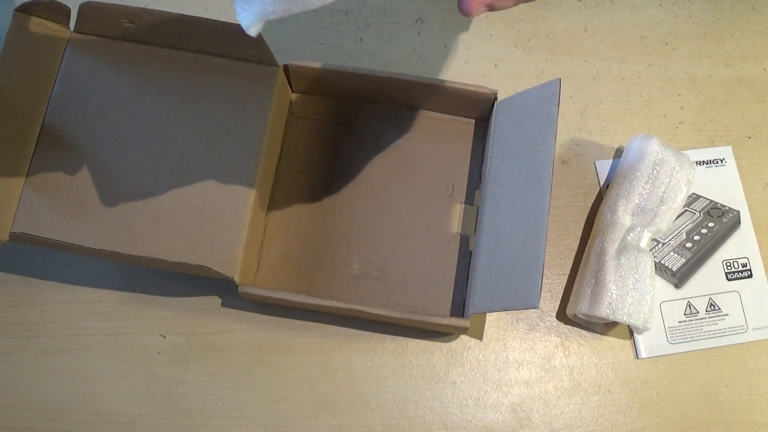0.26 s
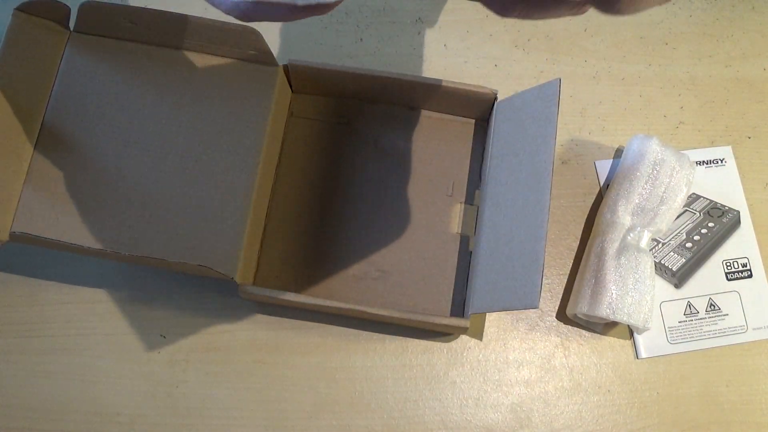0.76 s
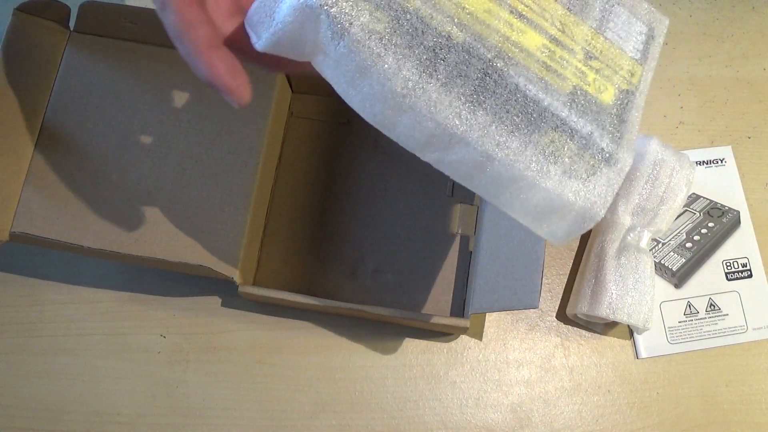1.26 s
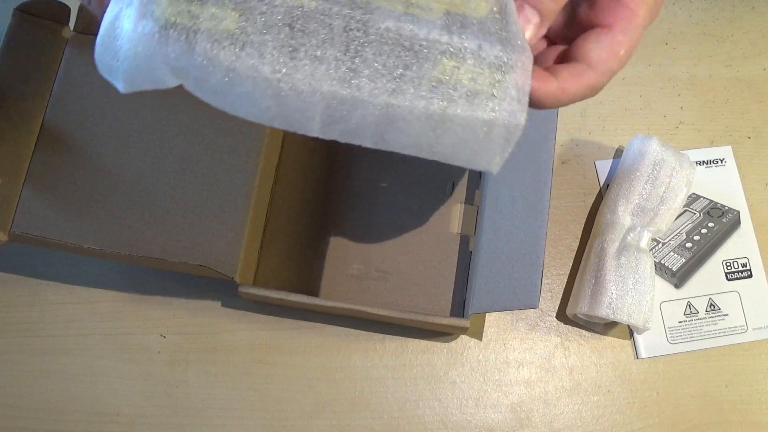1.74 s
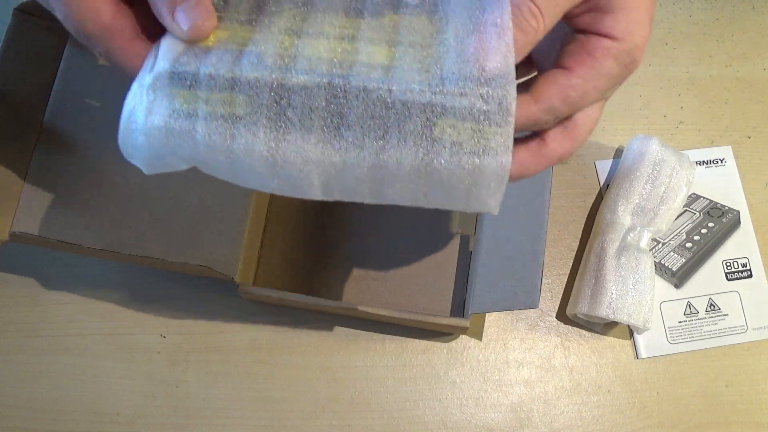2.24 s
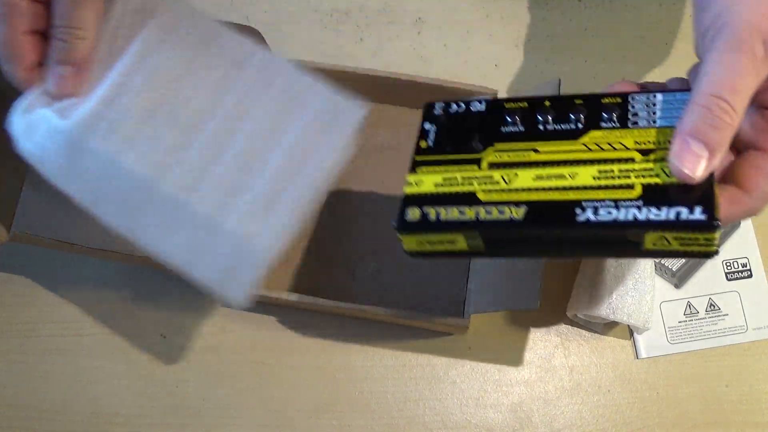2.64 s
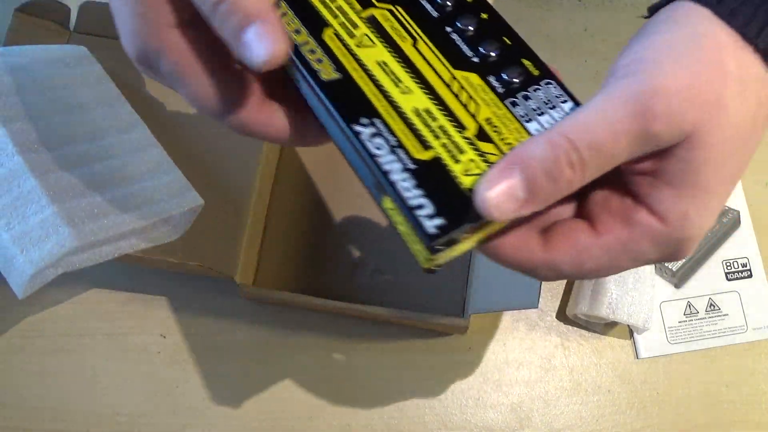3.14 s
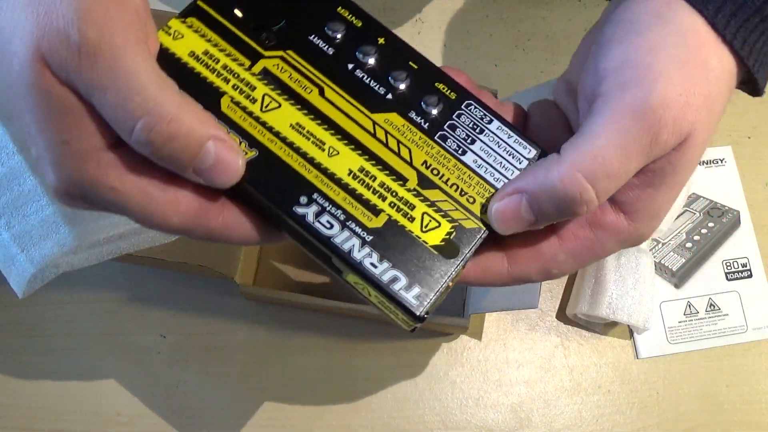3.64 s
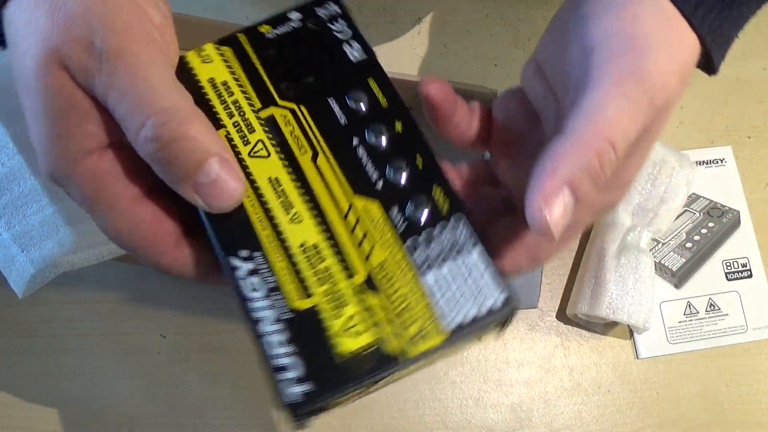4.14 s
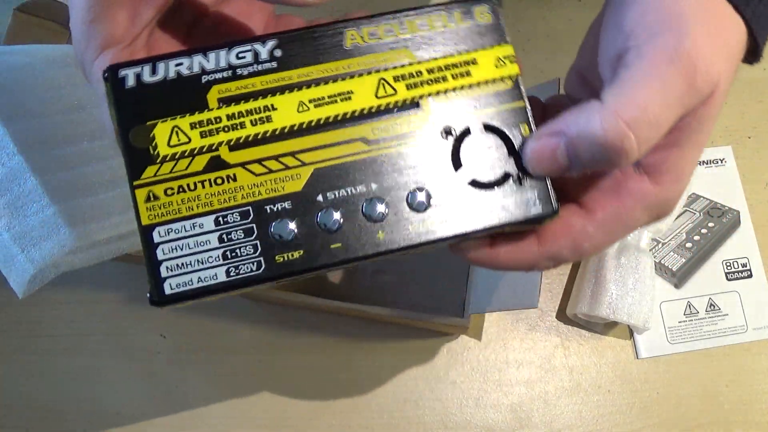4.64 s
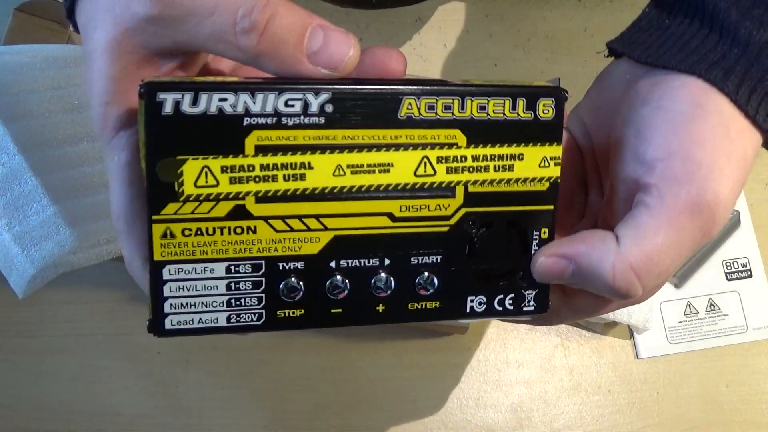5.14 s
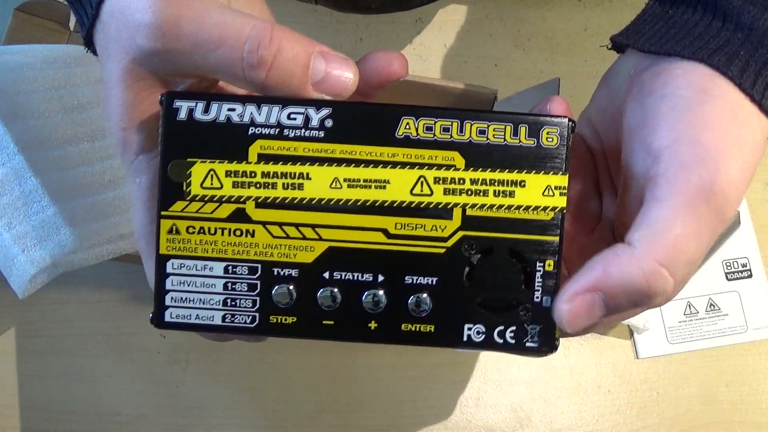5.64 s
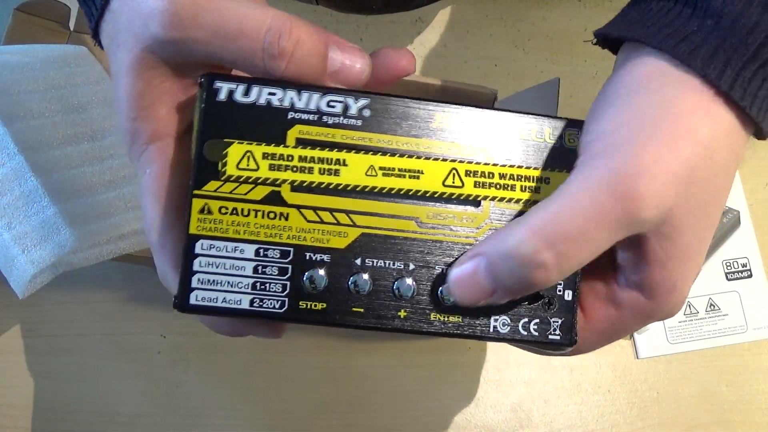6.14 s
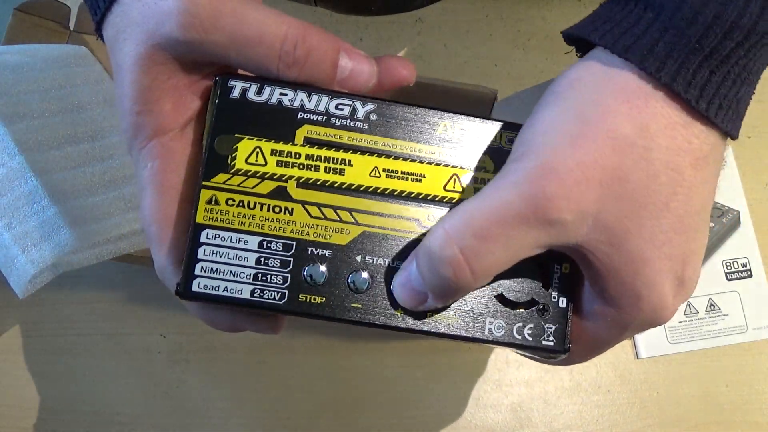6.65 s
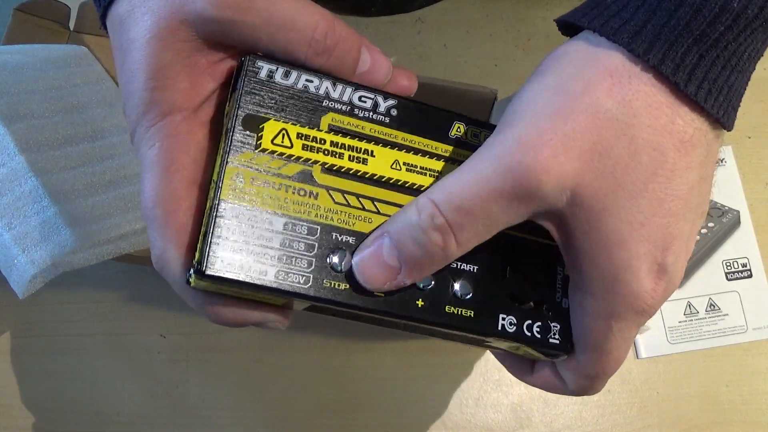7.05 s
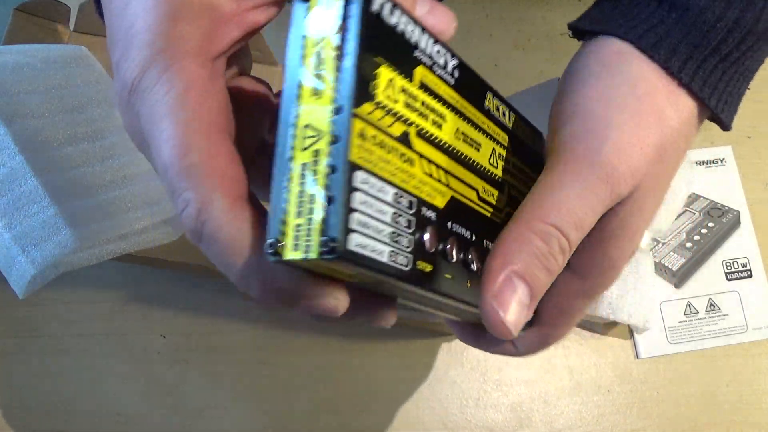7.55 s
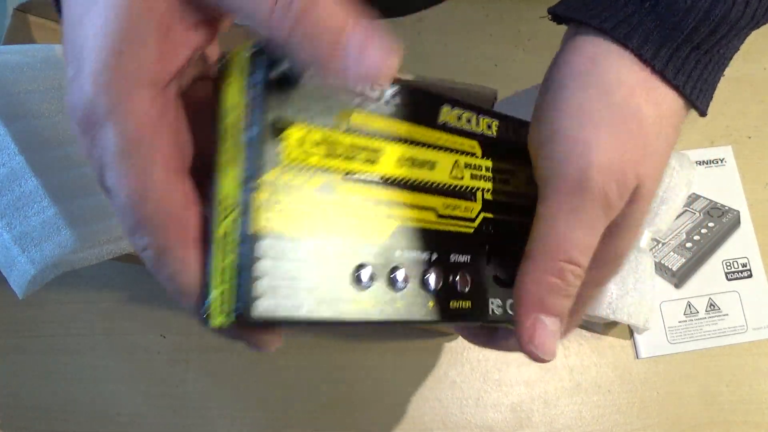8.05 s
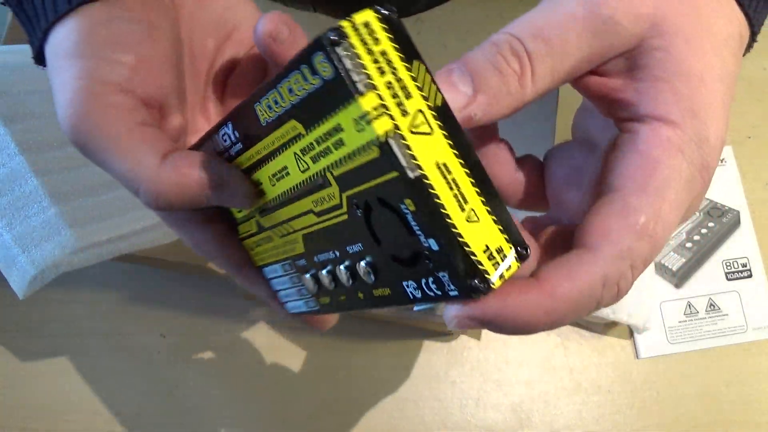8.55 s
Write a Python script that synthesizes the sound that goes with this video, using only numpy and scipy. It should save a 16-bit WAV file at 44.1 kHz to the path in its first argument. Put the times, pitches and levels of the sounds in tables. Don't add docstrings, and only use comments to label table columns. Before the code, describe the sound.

Close up over a table in a small room, thin packing foam is tugged off a hollow metal case in bright, crackling, squeaky bursts with sharp snaps. The rustle stops abruptly around three seconds; faint skin slides and soft scrapes follow. After a quiet pause, a thumb presses buttons with crisp irregular clicks and brief hollow knocks, ending in light ticks over low hiss and hum.

```python
import sys
import numpy as np
from scipy import signal
from scipy.fft import rfft, irfft
from scipy.io import wavfile
from scipy.ndimage import uniform_filter1d

SR = 44100
rng = np.random.default_rng(int(sys.argv[2]) if len(sys.argv) > 2 else 0)


def makeup_ratio(level_db):
    decades = np.asarray(level_db, float) / 20
    return 10 ** decades


def materialize(psi):
    bounded = np.clip(np.atleast_2d(psi).T, -1, 1)
    quanta = np.round(bounded * 32767).astype(np.int16)
    wavfile.write(sys.argv[1], SR, quanta)


N = 387638
TIME = np.arange(N) / SR


def evened(x):
    return x / np.sqrt(np.mean(x ** 2) + 1e-20)


def read(points, hz):
    f, value = np.transpose(points)
    return np.interp(np.log(hz + 1), np.log(f + 1), value)


def add(mix, s, sound):
    part = mix[round(s * SR):][:len(sound)]
    part += sound[:len(part)]


def slow(count, width):
    once = uniform_filter1d(rng.standard_normal(count), int(width))
    return evened(uniform_filter1d(once, int(width)))


# start_s, length_s, catch_db, release_db
TUGS = [(0.0, 0.11, -42.5, -32), (.12, 0.26, -44.5, -55.5), (.305, 0.061, -38.5, -30.5),
        (.395, 0.065, -35.5, -36.5), (.495, 0.023, -42.5, -39), (.611, 0.024, -43, -37.5),
        (.645, 0.21, -35, -36.5), (.87, 0.099, -35.5, -34.5), (1.0, 0.058, -37.5, -41),
        (1.09, 0.11, -57.5, -35.5), (1.34, 0.19, -46, -27.5), (1.54, 0.092, -31.5, -42),
        (1.66, 0.24, -39, -47), (1.926, 0.09, -38, -29), (2.03, 0.048, -37.5, -37),
        (2.10, 0.1, -46.5, -32.5), (2.21, 0.022, -36, -36.5), (2.26, 0.076, -47.5, -38),
        (2.35, 0.032, -36, -26), (2.385, 0.043, -35, -39.5), (2.44, 0.047, -37.5, -32.5),
        (2.50, 0.023, -24.5, -25.5), (2.55, 0.072, -35.5, -33.5), (2.635, 0.0074, -35, -31),
        (2.71, 0.049, -48, -41.5), (2.75, 0.022, -42, -54.5), (2.806, 0.0066, -34.5, -25.5),
        (2.823, 0.014, -37.5, -29.5), (2.885, 0.011, -44, -33), (2.92, 0.053, -53, -54)]
# start_s, brightest_hz of the stretched foam, weight_db on the case
SLEEVE = [(0.0, 6400, 3.5), (.3, 6050, 0), (.44, 4500, 2.5), (.65, 8000, -1), (1.04, 7400, 0),
          (1.3, 7400, 2.5), (1.53, 8300, -5.5), (1.75, 9350, -2), (1.93, 5260, -0.7), (2.11, 8150, -1.5),
          (2.21, 9350, -1.5), (2.38, 7430, -0.5), (2.45, 7500, -3), (2.53, 7100, 2.5), (2.61, 8750, -1.5),
          (2.83, 7100, 3.5), (3.06, 6600, 5.5)]
# pitch_hz, level_db per Hz
FOAM_TONE = [(150, -5.5), (370, -11.5), (450, -15.5), (1000, -6.5), (1800, -1), (2100, -3.5), (4000, 0.5),
             (7600, -0.5), (10300, -1), (11300, -4), (15100, -9), (16500, -17)]


def foam_sleeve():
    return rub(TUGS, SLEEVE, FOAM_TONE, rest_db=-58, body_db=-6.0, thud_db=-13.5, thud_slope=0.3,
               thud_weight=1.0, hum_db=4.5, low_hz=189, bright_db=3.5, patchy_db=2.17, hump_width=0.34,
               per_s=12000, spread_db=1.25, clump_db=1.3)


# start_s, length_s, catch_db, release_db
SLIDES = [(3.03, 0.053, -58, -53.5), (3.1, 0.25, -53, -55.5), (3.345, 0.29, -51, -58),
          (3.63, 0.61, -65.5, -70), (4.15, 0.13, -67.5, -53.5), (4.3, 0.65, -52.5, -57.5),
          (4.95, 0.65, -65.5, -75.5), (5.17, 0.052, -64, -67), (7.456, 0.098, -44.5, -75),
          (8.075, 0.044, -54.5, -51.5), (8.15, 0.11, -58.5, -66), (8.54, 0.057, -61, -75)]
# start_s, brightest_hz of the skin (without effect while bright_db is 0), weight_db on
GRIP = [(3.0, 4170, -7), (3.2, 3930, 1.5), (3.32, 4100, 0.5), (3.35, 8000, -4.3), (3.419, 8500, -4),
        (3.5, 8650, 0), (3.6, 8360, -1.5), (3.9, 5580, -2), (4.18, 8200, -2.5), (4.3, 8480, -9.5),
        (4.45, 8200, -8.5), (4.55, 8550, -3.5), (4.9, 8500, -5), (5.2, 5702, -1), (7.5, 4960, 1),
        (8.1, 7250, -9), (8.199, 5210, -2), (8.55, 5200, -8), (8.79, 4800, -5)]
# pitch_hz, level_db per Hz
SKIN_TONE = [(200, 10.5), (450, -13), (1150, 0.5), (1600, 0), (1990, -2), (2600, -0.5), (3650, -0.5),
             (4200, -2), (4650, -2), (5600, -3.5), (8800, -5), (10500, -7.5), (15300, -19), (16500, -20)]


def sliding_fingers():
    return rub(SLIDES, GRIP, SKIN_TONE, rest_db=-100.0, body_db=2.5, thud_db=-9, thud_slope=0.3,
               thud_weight=0.22, hum_db=7.5, low_hz=390, bright_db=0.0, patchy_db=1.2, hump_width=0.054,
               per_s=12000, spread_db=1.6, clump_db=1.1)


def effort(strokes, t, rest_db):
    catch_db_per_s, release_db_per_s = 1512, 815
    s, length, catch_db, release_db = np.transpose(strokes)[:, :, None]
    db = catch_db + (release_db - catch_db) * np.clip((t - s) / length, 0, 1)
    db = db - catch_db_per_s * np.maximum(s - t, 0)
    db = db - release_db_per_s * np.maximum(t - s - length, 0)
    return 10 * np.log10((makeup_ratio(db) ** 2).sum(0) + makeup_ratio(rest_db) ** 2)


def slips(count, per_s, spread_db, clump_db):
    size = makeup_ratio(spread_db * np.minimum(rng.exponential(1, count), 5)) * rng.standard_normal(count)
    snaps = evened(size * (rng.random(count) < per_s / SR))
    grain = snaps + 0.7 * rng.standard_normal(count)
    return evened(grain * makeup_ratio(clump_db * slow(count, width=130)))


# start_s, length_s, pitch_hz, width_hz, level_db
POCKETS = [(.06, .06, 4600, 600, 4), (0.335, .04, 6940, 500, 5), (.41, .055, 4200, 400, 7),
           (.4, .07, 746, 250, 8), (.68, .07, 4400, 400, 3), (.88, 0.09, 3700, 500, 3),
           (1.0, .06, 2010, 350, 5), (1.0, .06, 6900, 400, 4), (1.47, 0.11, 8100, 700, 6),
           (1.47, 0.072, 4460, 400, 4.5), (1.57, 0.055, 5800, 350, 1), (1.676, 0.18, 9000, 700, 6),
           (1.92, 0.076, 3720, 1200, 3.5), (1.994, 0.025, 8000, 600, 10), (2.053, .03, 8000, 600, 4),
           (2.1, .14, 9500, 300, 5), (2.33, .05, 7500, 900, 2), (2.49, 0.031, 7800, 600, 6),
           (2.504, 0.018, 2000, 800, 7), (2.55, .1, 8820, 800, 6), (3.104, 0.54, 2010, 250, 6),
           (3.103, 0.407, 3780, 400, 5), (3.339, 0.055, 7600, 700, 5), (3.34, 0.2, 8740, 300, 7),
           (3.59, .11, 4650, 150, 10), (4.2, .3, 8400, 550, 8), (4.22, 0.61, 4750, 150, 5),
           (4.22, .2, 5900, 200, 4), (4.2, 0.22, 9730, 300, 8), (8.067, .07, 6000, 300, 1),
           (8.17, .05, 7400, 300, 4), (8.1, .15, 3900, 250, 2)]


def rub(strokes, hold, tone, rest_db, body_db, thud_db, thud_slope, thud_weight, hum_db, low_hz,
        bright_db, patchy_db, hump_width, **grain):
    s, bright_hz, weight_db = np.transpose(hold)
    count = round((s[-1] - s[0]) * SR)
    hz, t, z = signal.stft(slips(count, **grain), SR, nperseg=256, noverlap=192)
    now, pitch = t + s[0], hz[:, None]
    bright_hz = np.interp(now, s, bright_hz)[None]
    weight_db = np.interp(now, s, weight_db)[None]
    effort_db = effort(strokes, now, rest_db)[None]

    hump = np.exp(-(np.log((pitch + 1) / bright_hz) / hump_width) ** 2)
    patches = uniform_filter1d(rng.standard_normal(z.shape), 5, axis=0)
    patches = evened(uniform_filter1d(patches, 20, axis=1))
    colour = makeup_ratio(read(tone, hz)[:, None] + bright_db * hump + patchy_db * patches)
    colour *= makeup_ratio(0.059 * (effort_db + 12.0) * np.clip(pitch / 3000 - 3.2, 0, 1))
    for start, length, pocket_hz, width, db in POCKETS:
        since = now - start
        sings = np.clip(np.minimum(since, length - since) / 0.012 + 0.5, 0, 1)
        colour *= makeup_ratio(db * np.outer(np.exp(-((hz - pocket_hz) / width) ** 2), sings))
    for hum_hz in (764, 334):
        colour *= makeup_ratio(hum_db * np.exp(-(np.log((pitch + 1) / hum_hz) / 0.07) ** 2))
    colour *= np.minimum(pitch / low_hz, 1) ** 2

    part = np.digitize(hz, [950, 4000])
    thud = thud_db + thud_weight * weight_db - thud_slope * (effort_db + 38.0)
    for k, db in enumerate((thud, body_db + weight_db, 0)):
        power = (colour[part == k] ** 2).sum(0) / len(hz)
        colour[part == k] *= makeup_ratio(db) / np.sqrt(power)
    sound = signal.istft(z * colour, SR, nperseg=256, noverlap=192)[1][:count]
    level = makeup_ratio(np.interp(TIME[:count], t, effort_db[0]))
    return s[0], sound * level * signal.windows.tukey(count, 200 / count)


# start_s, peak_db, brightest_hz
CRACKLES = [(0.0648, -16, 5720), (0.638, -16, 5280), (0.7677, -18, 4130), (0.7794, -30, 2480),
            (0.8534, -20.5, 1860), (1.032, -28, 1880), (1.128, -23, 6750), (1.187, -21, 7640),
            (1.2925, -38, 3800), (1.385, -22, 4330), (1.407, -18, 4470), (1.7594, -21, 8800),
            (1.9387, -15, 3500), (2.035, -19, 1960), (2.1714, -29, 9490), (2.2994, -22, 4720),
            (2.4564, -24, 5430), (2.492, -11, 8160), (2.4962, -12, 7480), (2.512, -13, 7850),
            (2.5724, -15, 8490), (2.6068, -4.5, 8850), (2.6389, -14.5, 1820), (2.7332, -24, 6120),
            (2.8706, -27, 2010), (2.9294, -28, 7450), (2.9444, -33, 1560), (2.9693, -31, 4360),
            (3.079, -35, 7230), (3.2832, -22.5, 3390), (7.0594, -34, 2730), (0.4947, -22, 7110),
            (1.3399, -24, 7250), (2.5167, -11, 3530), (2.92, -28, 8000)]


def crackle(s, db, hz):
    t = TIME[:600]
    burst = rng.standard_normal(len(t)) * np.exp(-t / 0.0012)
    edges = np.clip(hz * np.exp([-0.43, 0.43]), 100, SR / 2.2)
    tick = signal.sosfilt(signal.butter(1, edges, "band", fs=SR, output="sos"), burst)
    return s, makeup_ratio(db - 4.5) * tick / abs(tick).max()


# start_s, snap_db, flex_db of the panel, push_db on the hollow
BUTTONS = [(6.2523, -64.5, -59, -60), (6.337, -9, -22, -26.5), (6.4713, -23.5, -44, -26.5),
           (6.5116, -2.5, -32, -30), (6.5587, -63, -40, -45.5), (6.6063, -19.5, -32, -33.5),
           (6.6963, -44, -62, -55), (6.704, -28, -38.5, -37), (6.7272, -27, -55, -60),
           (6.7411, -37, -46, -47), (6.769, -41, -70, -68), (6.8627, -14.5, -61, -52),
           (6.996, -12, -22.5, -30.5), (7.0967, -4, -45, -22), (7.1703, -30.5, -55, -75),
           (7.236, -11.5, -19.5, -26), (7.3783, -48, -46.5, -23.5), (7.386, -35.5, -66, -49),
           (7.408, -24.5, -39.5, -32.5), (8.0162, -45, -65, -64), (8.3012, -12.5, -32.5, -27),
           (8.3262, -15, -35, -36), (8.4647, -22, -42, -35), (8.5417, -52, -58, -62)]
# low_hz, low_db, high_hz, high_db
TOUCH = [(2720, 11, 4410, 4), (3300, -10, 5250, 8), (5140, 5, 8700, 7), (5020, 14, 9400, 11.5),
         (2120, 13, 4570, 1), (2060, 8, 6400, 2), (4130, 4, 4280, 4), (2800, 13, 4000, 2),
         (2770, 8, 8800, -1), (1970, 5, 6900, 2), (2960, 4, 6200, 4), (3980, 7.5, 6600, 3),
         (2800, -1, 5000, -1), (4650, 6, 7700, 0.5), (3320, 4, 4640, 4), (2240, 6, 4700, 4.5),
         (1300, 21, 5100, -2), (1300, 4, 10200, 6), (2800, 9, 4800, 5), (1400, 6, 6980, 2),
         (1660, 10.5, 3400, 8), (3900, 4, 6700, 10), (4010, 5, 7000, 12), (3480, 6, 4740, 4)]


def press_buttons(case):
    for row, touch in zip(BUTTONS, TOUCH):
        add(case, *knock(*row, touch=touch, lid_push=0.78, lid_db=-2.5, chatter_s=0.0038,
                         tail_db=-28.0, tail_s=0.24))


# start_s, snap_db, flex_db of the panel, push_db on the hollow
SNAPS = [(0.2159, -30, -60, -70), (0.2412, -27, -55, -61), (0.2969, -28, -39, -53), (0.4219, -18, -54, -37),
         (0.6386, -27, -53, -48), (0.768, -33, -42, -47), (0.852, -26, -42.5, -40.5),
         (1.032, -35, -38, -75), (1.2015, -12, -38, -87), (1.648, -19, -34.5, -28), (1.833, -18, -47, -80),
         (2.0879, -19.5, -57, -66), (2.5104, -7, -30.5, -50), (2.606, -11, -32.5, -40),
         (2.8138, -31, -25.5, -46), (2.886, -17, -50, -49), (3.028, -33, -57, -57),
         (3.056, -31.5, -53.5, -49), (3.2827, -28, -49.5, -43), (4.068, -42.5, -63, -59)]
# pitch_hz, level_db
SNAP_TOUCH = [(7300, 4), (6460, 6), (1610, 8), (4600, 2), (5280, 4), (4130, 4), (1860, 14), (1880, 13),
              (7200, 8), (1630, 2), (6640, 9), (9500, 8), (7850, 9), (8850, 5), (1850, -11), (8980, 3),
              (4190, 6), (7300, 5), (3390, 17), (5000, 1)]


def snap_folds(case):
    for row, touch in zip(SNAPS, SNAP_TOUCH):
        add(case, *knock(*row, touch=touch, lid_push=0.1, lid_db=4.5, chatter_s=0.0047,
                         tail_db=-10.0, tail_s=0.073))


# start_s, snap_db, flex_db of
# the panel, push_db on the hollow
TICKS = [(6.837, -41, -75, -70), (7.358, -49, -61, -61), (7.977, -46, -69, -71), (8.134, -31.5, -61, -52.5),
         (8.2953, -35, -67, -68), (6.5165, -15, -44, -60), (6.435, -75, -65, -62.5),
         (6.484, -53, -48.5, -60), (8.324, -32, -65, -70), (8.58, -55, -63, -79), (8.647, -57, -65, -80),
         (8.71, -59, -66, -79)]


def tick_caps(case):
    for row in TICKS:
        add(case, *knock(*row, lid_push=0.54, lid_db=5.0, chatter_s=0.0028, tail_db=-18.5, tail_s=0.067))


# pitch_hz, level_db
TOP = [(6850, 1.5), (7390, 6), (7950, 5), (8700, 3), (9300, 5.5), (9870, 3.5), (10500, -1.5), (11300, -6),
       (12300, -11), (13400, -16), (14600, -26)]
HOLLOW = [(740, 14), (865, 14)]
LID = [(1200, -0.43), (1480, 1.6), (1650, -0.94), (1890, 0.38)]
PANEL = [(2170, 4.5), (2400, 2), (2760, 7.1), (3270, 7.6)]
SWITCH = [(3700, 3), (3980, 3.5), (4650, 3), (5090, 1.5), (5740, 1.5), (6100, 0)]
RING_S = [
    0.0027,
    0.028,
    0.012,
    0.015,
    0.0041,
]
WASH_DB = [
    -2,
    -5,
    4,
    5,
    3,
]


def knock(s, snap_db, flex_db, push_db, lid_push, lid_db, chatter_s, tail_db, tail_s, touch=(1, 0, 1, 0)):
    t, sound = TIME[:7000], 0
    ring_t = t[:2400]
    snap_lag_s = 0.0008
    lid_db = lid_db + flex_db + lid_push * (push_db - flex_db)
    switch_db = -2 + flex_db + 0.44 * (snap_db - flex_db)
    family_db = snap_db, push_db, lid_db, flex_db, switch_db

    chatter, echoes = rng.standard_normal((2, len(t)))
    chatter = chatter * np.exp(-((t - snap_lag_s) / chatter_s) ** 2)
    chatter = chatter * np.clip((t - snap_lag_s) / 0.00017, 0, 1)
    push = np.exp(-((t - 0.0004) / 0.00019) ** 2) * 2
    echoes = echoes * makeup_ratio(tail_db - 60 * t / tail_s) * np.minimum(t / 0.003, 1)

    drives = chatter, push, chatter, chatter, chatter
    families = zip((TOP, HOLLOW, LID, PANEL, SWITCH), RING_S, drives, WASH_DB, family_db)
    for family, t60, drive, wash_db, db in families:
        hz, mode_db = np.transpose(family)[:, :, None]
        for touch_hz, touch_db in zip(touch[::2], touch[1::2]):
            mode_db = mode_db + touch_db * np.exp(-(np.log(hz / touch_hz) / 0.1) ** 2)
        gripped_hz = hz * (1 + 0.012 * rng.standard_normal(hz.shape))
        modes = makeup_ratio(mode_db - 60 * ring_t / t60) * np.sin(2 * np.pi * gripped_hz * ring_t)

        struck = signal.fftconvolve(modes, drive[None, :1200], axes=1)
        struck *= (np.linalg.norm(modes, axis=1) / np.linalg.norm(struck, axis=1))[:, None]
        struck = np.linalg.norm(drive) * (struck[::2].sum(0) - struck[1::2].sum(0))
        free = modes[::2].sum(0) - modes[1::2].sum(0)

        smeared = free if family is HOLLOW else free * makeup_ratio(-60 * ring_t / 0.002)
        smeared = smeared * np.linalg.norm(free) / np.linalg.norm(smeared)
        wash = signal.fftconvolve(smeared, makeup_ratio(wash_db) * echoes)[:len(t)]
        heard = wash + np.pad(struck, (0, len(t) - len(struck)))
        level_db = db - 16.5 if family is TOP else db - 2.5
        sound = sound + makeup_ratio(level_db) * heard / np.sqrt(np.mean(heard[:300] ** 2))
    return s - snap_lag_s, sound


# start_s, peak_db
SKIDS = [(4.3814, -32), (4.491, -31.5), (4.563, -30.5), (4.6422, -31), (4.703, -31), (4.7732, -31),
         (4.873, -31)]
# pitch_hz, level_db per Hz
SKID_TONE = [(240, -35), (400, -22), (1130, -5.5), (1600, -10.5), (1980, -2), (2400, -4.5), (2850, -4),
             (3900, -5), (5190, -12), (6150, -11), (8300, -16.5), (9700, -12), (11000, -22), (16000, -45)]


def skid(s, db):
    rise_s, t60_s = 0.016, 0.17
    t = TIME[:SR // 5]
    shape = np.minimum(t / rise_s, 1) * makeup_ratio(-60 * np.maximum(t - rise_s, 0) / t60_s)
    z = rfft(slips(len(t), per_s=9000, spread_db=2.5, clump_db=0.8))
    colour = makeup_ratio(read(SKID_TONE, np.fft.rfftfreq(len(t), 1 / SR)))
    rasp = evened(irfft(z * colour, len(t)))
    return s - 0.52 * rise_s, makeup_ratio(db - 9.5) * shape * rasp


# start_s, peak_db, pitch_hz, push_s
BUMPS = [(0.064, -31.5, 610, 0.0024), (0.296, -41, 368, 0.0058), (0.299, -21.5, 970, 0.0004),
         (.85, -39, 340, 0.003), (1.648, -45.5, 572, 0.011), (2.261, -59, 123.5, 0.0074),
         (2.512, -46, 325.5, 0.0063), (2.599, -42.5, 124, 0.0086), (2.812, -37.5, 368, 0.0035),
         (2.8125, -20, 1206, 0.0018), (2.8125, -12, 1760, 0.00073), (2.8135, -25, 2390, 0.0026),
         (3.0, -51, 790, 0.0048), (3.065, -50, 1300, .003), (3.285, -52, 825, 0.011),
         (7.381, -22, 1110, 0.00062), (2.88, -41, 310, 0.0057), (3.873, -51.5, 258, 0.0072),
         (2.519, -44.5, 490, 0.0087), (6.9967, -28.5, 1080, 0.00061), (5.381, -58, 123, 0.0064)]


def bump(s, db, hz, push_s):
    t = TIME[:3000]
    push = (t / push_s) * np.exp(-t / push_s)
    return s, makeup_ratio(db + 10) * np.sin(2 * np.pi * hz * t) * push


# pitch_hz, t60_s
ROOM = [(300, 0.51), (1000, 0.2), (3500, 0.25), (9000, 0.15), (15000, 0.29)]


def room(x, same):
    taps = np.zeros((2, SR // 2))
    starts = np.arange(200, SR // 2 - 20, 20)
    at = starts + rng.integers(0, 20, (2, len(starts)))
    np.put_along_axis(taps, at, rng.choice([-1., 1.], at.shape), 1)
    hz, t, z = signal.stft(taps, SR, nperseg=256)
    shared, apart = signal.istft(z * makeup_ratio(-60 * t / read(ROOM, hz)[:, None]), SR, nperseg=256)[1]
    tail = np.array([shared + (1 - same) * apart, shared - (1 - same) * apart])
    return signal.fftconvolve(x[None], tail / np.linalg.norm(tail[0]), axes=1)[:, :N]


# start_s, pitch_hz, level_db
WHINE = [
    [(5.0, 2935, -99), (5.1, 2810, -84), (5.3, 2795, -72), (5.708, 2563, -74.5), (6.3, 2620, -74.5)],
    [(8.58, 2839, -79), (8.622, 2703, -71), (8.79, 2800, -78)],
]
# start_s, pitch_hz, level_db
HUM = [(0.0, 118, -71), (.98, 109, -68), (1.1, 121.2, -64), (1.5, 110.5, -74.5), (2.67, 120.6, -62.5),
       (3.23, 114.2, -70), (3.55, 118.5, -66), (3.74, 108.3, -75), (4.15, 115, -70), (5.2, 112.5, -74),
       (5.45, 112, -67), (5.8, 108.7, -73), (6.1, 110, -62.5), (6.4, 108.8, -72), (6.9, 106.5, -68.5),
       (8.15, 107, -86), (8.79, 119, -68)]
# start_s, pitch_hz, level_db
DRONE = [(8.0, 172, -74), (8.3, 175, -68.5), (8.79, 173.6, -66)]


def motor_and_hums(far):
    for rows in WHINE:
        add(far, *far_line(rows, waver=0.002, throb_per_s=30, throb=2.2))
    add(far, *far_line(HUM, waver=0.008, throb_per_s=3, throb=0.2))
    add(far, *far_line(DRONE, waver=0.005, throb_per_s=3, throb=0.1))


def far_line(rows, waver, throb_per_s, throb):
    s, hz, db = np.transpose(rows)
    t = np.arange(s[0], s[-1], 1 / SR)
    turns = np.cumsum(np.interp(t, s, hz) * (1 + waver * slow(len(t), width=530))) / SR
    beat = evened(np.exp(throb * np.sin(2 * np.pi * throb_per_s * t)))
    level = np.sqrt(2) * makeup_ratio(np.interp(t, s, db)) * beat
    return s[0], level * np.sin(2 * np.pi * turns) * signal.windows.tukey(len(t), 0.1)


# pitch_hz, level_db per Hz
HISS = [(12, -19.5), (20, -17), (43, 0.5), (75, -17.5), (111, -4.5), (244, -11.5), (281, -6), (305, -14.5),
        (342, -12), (506, -13), (2310, -19), (2510, -24), (2730, -20.5), (15200, -31.5), (16500, -35)]
# pitch_hz, likeness (0 to 1)
SAME = [(60, 0.84), (240, 0.77), (950, 0.13), (3770, 0.56), (15000, 1)]


def hiss():
    frames, hz = N // 512 + 5, np.fft.rfftfreq(2048, 1 / SR)
    a, b, c, d, patches = rng.standard_normal((5, len(hz), frames))
    patches = evened(uniform_filter1d(uniform_filter1d(patches, 20, axis=0), 8, axis=1))
    same = np.clip(read(SAME, hz), -1, 1)[:, None]
    left = a + 1j * b
    right = same * left + np.sqrt(1 - same ** 2) * (c + 1j * d)
    z = np.array([left, right]) * makeup_ratio(read(HISS, hz)[:, None] + 0.9 * patches)
    return makeup_ratio(-59) * evened(signal.istft(z, nperseg=2048, noverlap=1536)[1][:, :N])


def scene():
    rubs, case, far = np.zeros((3, N))
    add(rubs, *foam_sleeve())
    add(rubs, *sliding_fingers())
    for play, rows in ((crackle, CRACKLES), (skid, SKIDS), (bump, BUMPS)):
        for row in rows:
            add(rubs, *play(*row))
    press_buttons(case)
    snap_folds(case)
    tick_caps(case)
    motor_and_hums(far)
    case = signal.sosfilt(signal.butter(8, 680, "high", fs=SR, output="sos"), case)
    near = rubs + case
    beside = np.roll(near, 5) - np.roll(near, 9)
    direct = near * makeup_ratio(np.array([[0.25], [-0.25]])) + makeup_ratio(-23) * np.array([beside, -beside])
    answer = makeup_ratio(-19) * room(case, same=0.69) + makeup_ratio(-11.0) * room(rubs, same=0.55)
    return direct + answer + far + hiss()


def top_cut(x):
    return signal.sosfilt(signal.butter(12, 16880, fs=SR, output="sos"), x)


def record(dry):
    mid, side = (dry[0] + dry[1]) / 2, (dry[0] - dry[1]) / 2
    side = signal.sosfilt(signal.butter(2, 260, "high", fs=SR, output="sos"), side)
    side = 0.75 * signal.oaconvolve(side, signal.firwin(101, 11500, fs=SR), "same") + 0.45 * side
    edge_hz = [0, 15850, 16050, 16750, 16950, SR / 2]
    edge = signal.firwin2(511, edge_hz, [1, 1, 0.1, 0.06, 0, 0], fs=SR)
    pair = signal.oaconvolve(np.array([mid + side, mid - side]), edge[None], "same", axes=1)
    return top_cut(pair)


dry = scene()
out = record(dry)
materialize(out)
```